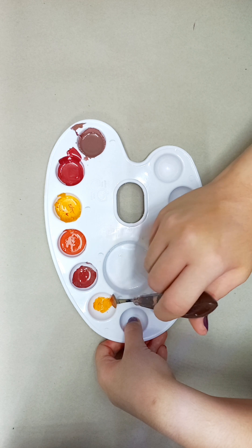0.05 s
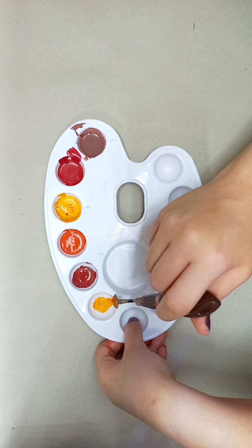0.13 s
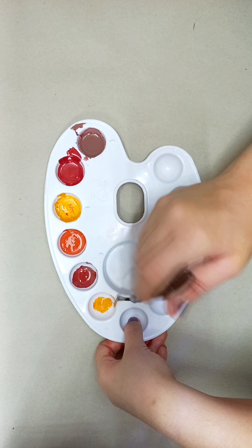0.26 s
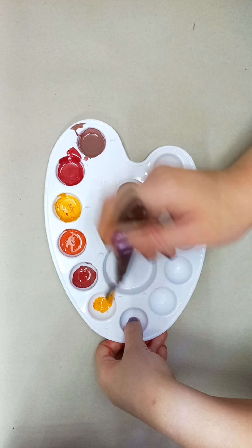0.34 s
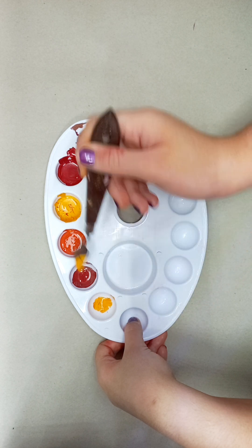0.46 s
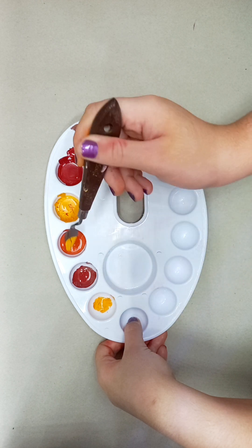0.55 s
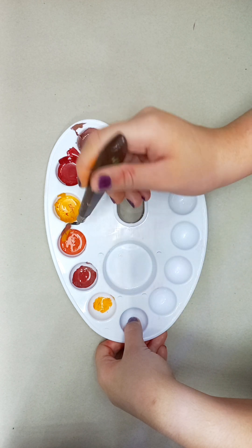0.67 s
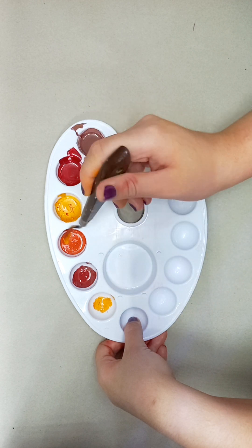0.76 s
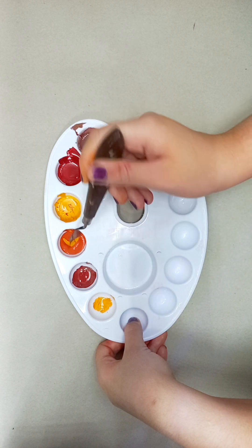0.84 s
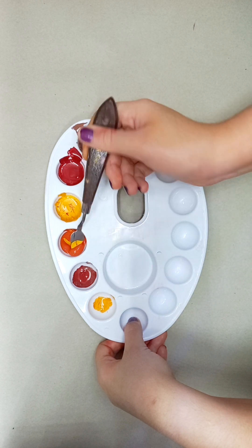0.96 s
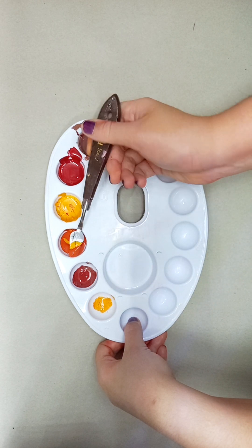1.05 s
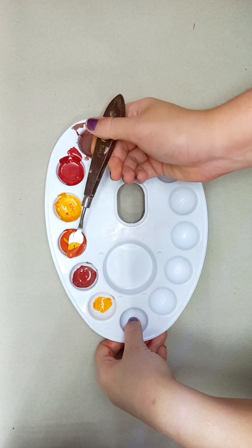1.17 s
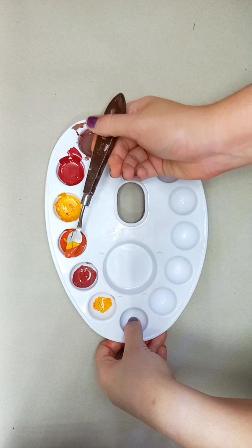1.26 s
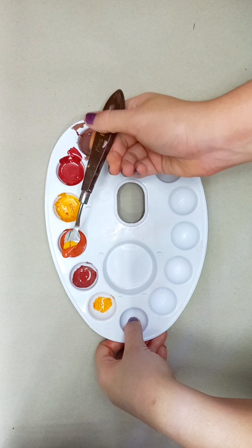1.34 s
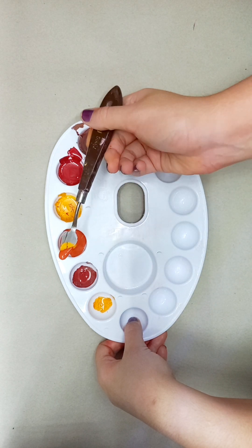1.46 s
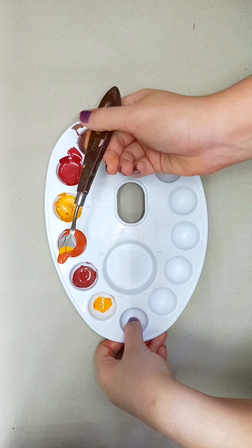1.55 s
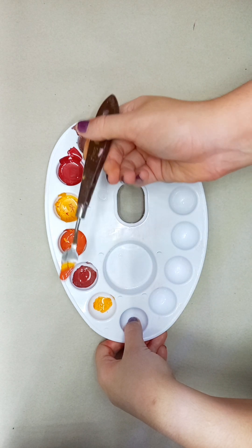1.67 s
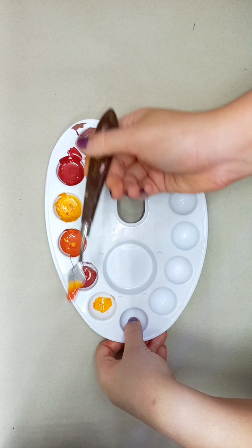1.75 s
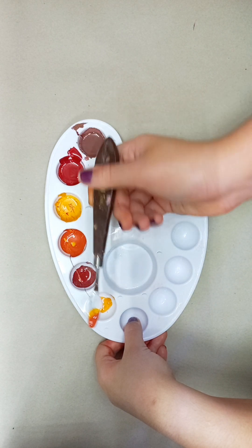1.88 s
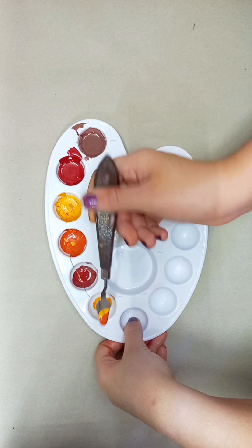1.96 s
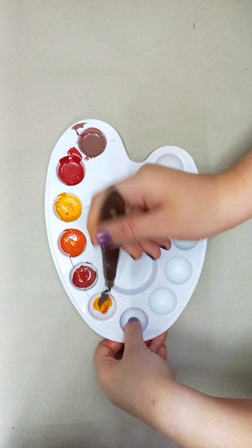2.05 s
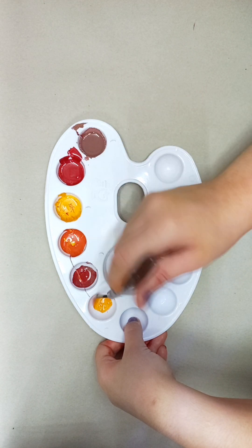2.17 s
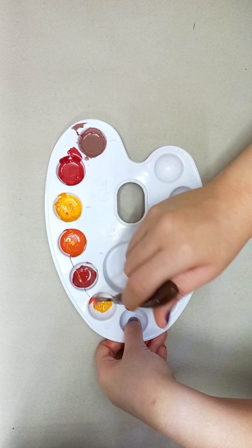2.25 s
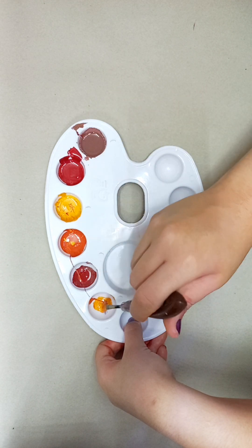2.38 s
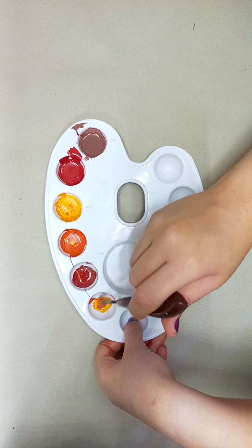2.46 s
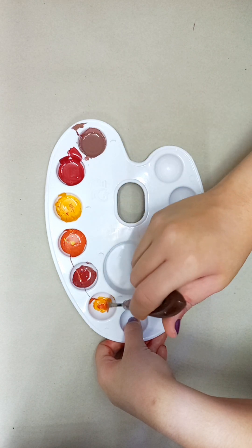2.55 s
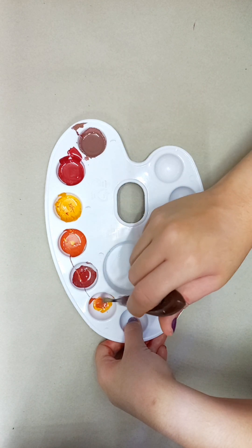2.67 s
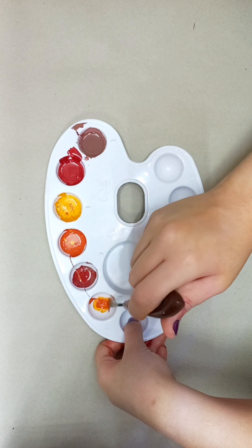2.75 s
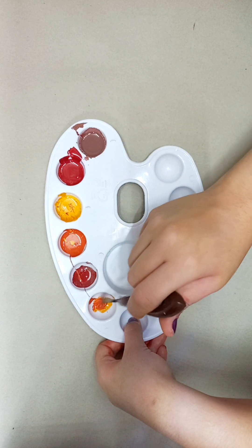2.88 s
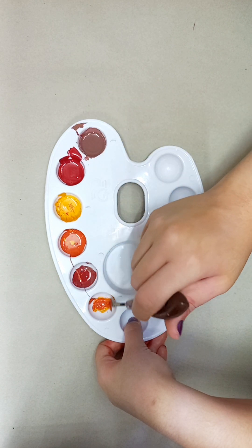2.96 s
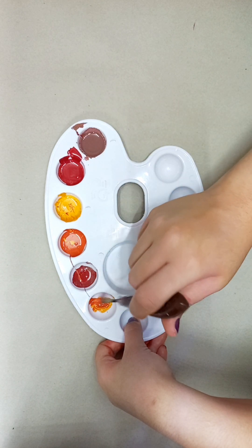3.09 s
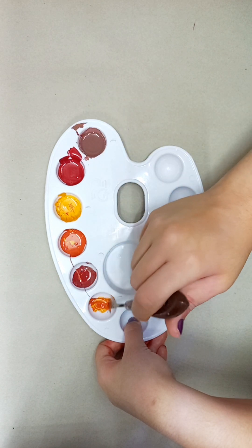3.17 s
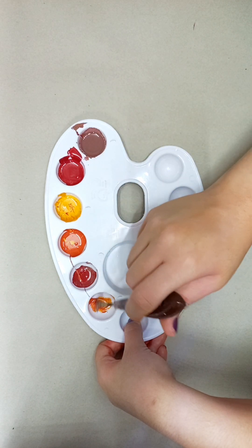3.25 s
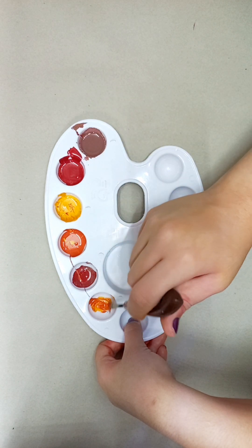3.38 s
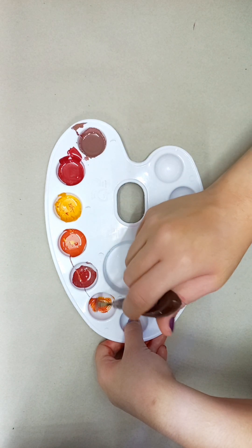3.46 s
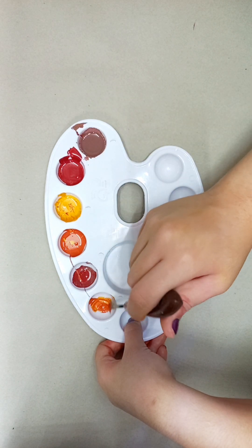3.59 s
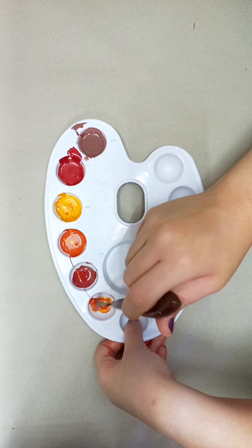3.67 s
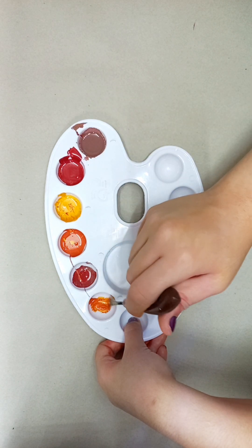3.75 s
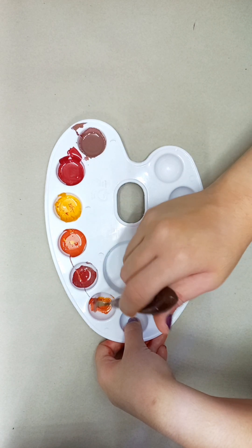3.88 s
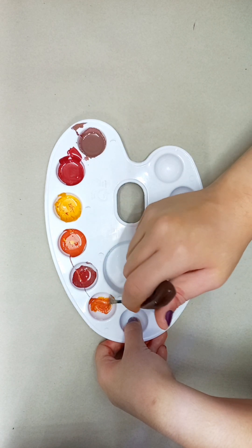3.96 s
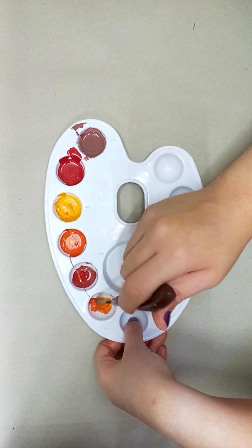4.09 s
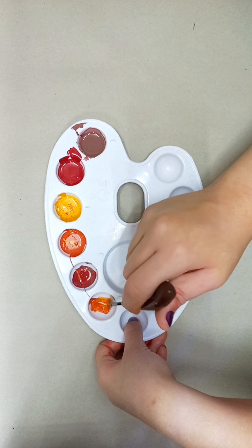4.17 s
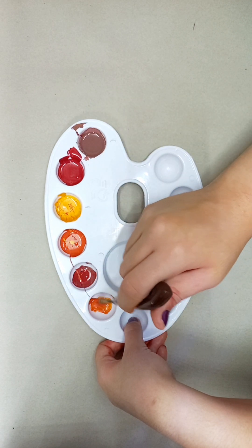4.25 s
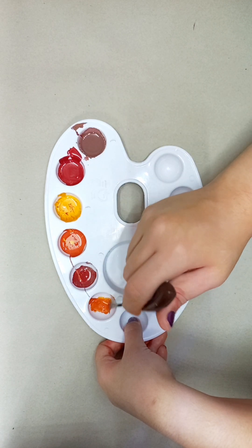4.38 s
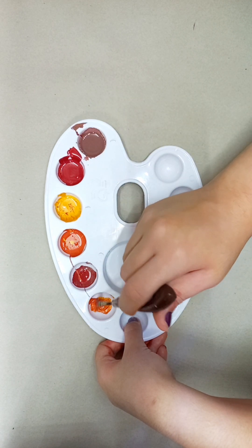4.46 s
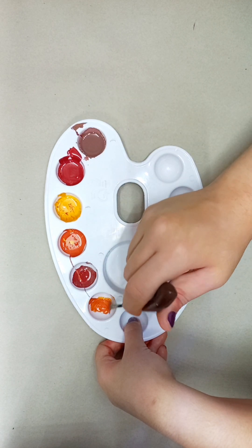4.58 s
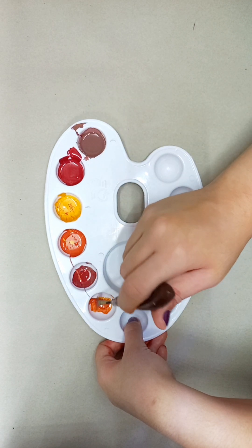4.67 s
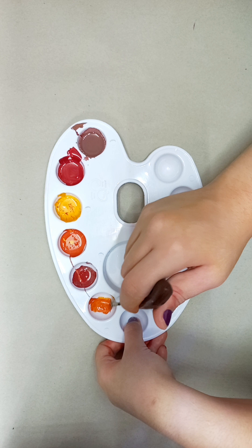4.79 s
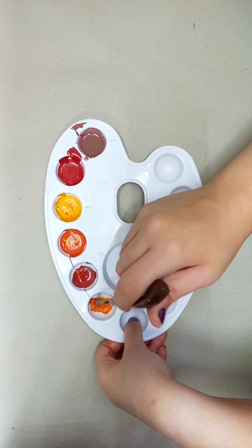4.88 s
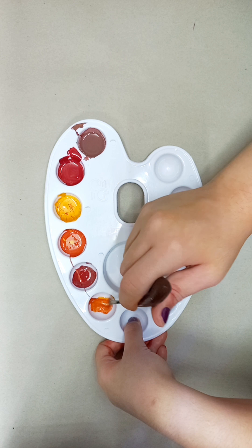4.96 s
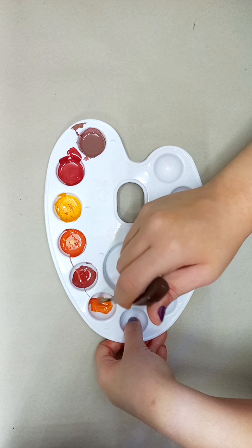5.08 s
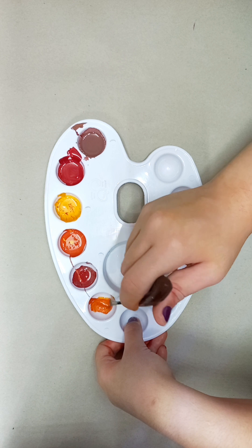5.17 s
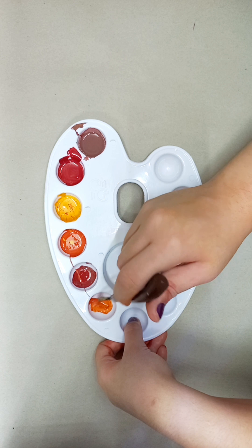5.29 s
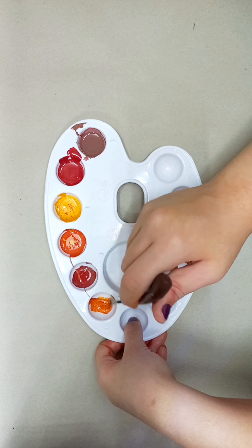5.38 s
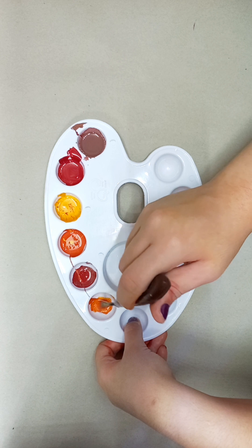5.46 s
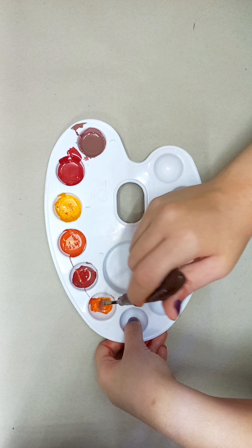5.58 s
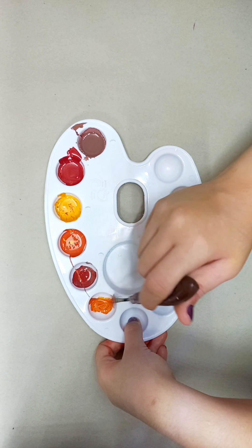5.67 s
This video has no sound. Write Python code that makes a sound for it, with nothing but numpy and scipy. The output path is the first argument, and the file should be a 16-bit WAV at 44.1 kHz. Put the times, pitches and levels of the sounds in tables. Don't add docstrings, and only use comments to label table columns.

```python
import sys
import numpy as np
from scipy import signal
from scipy.io import wavfile

SR = 44100
rng = np.random.default_rng(int(sys.argv[2]) if len(sys.argv) > 2 else 0)


def transcribe(u):
    v = np.clip(np.atleast_2d(u).T, -1, 1)
    q = np.round(v * 32767).astype(np.int16)
    wavfile.write(sys.argv[1], SR, q)


def boost(x):
    u = np.asarray(x, float) / 20
    return 10 ** u


N = 252693
RUN_IN = 4410
EDGES_HZ = 25 * 2 ** (np.arange(30) / 3.1)
BANK = [signal.butter(2, edges, "band", fs=SR, output="sos") for edges in zip(EDGES_HZ, EDGES_HZ[1:])]

# (time [s], wall ring [dB], dish pitch [Hz], dish level [dB], blade edge level [dB])
STIR_TAPS = [(2.887, -15.5, 862, -21, -35.5), (3.1243, -14.5, 907, -21, -29.5),
             (3.3168, -13.5, 917, -19.5, -32), (3.5187, -12.5, 926, -18.5, -29.5),
             (3.7271, -13, 946, -19.5, -29.5), (3.9402, -14, 962, -20, -26), (4.1428, -9.5, 920, -18, -28),
             (4.3337, -13.5, 787, -22.5, -33.5), (4.5177, -11.5, 910, -17, -33),
             (4.7222, -9.5, 920, -16, -27), (4.9432, -10.5, 922, -18.5, -24.5),
             (5.1434, -13.5, 854, -19.5, -31), (5.3314, -8.5, 916, -18, -25)]


def rms_one(x):
    return x / np.sqrt(np.mean(x ** 2) + 1e-20)


def at_hz(points, hz):
    points = np.array(points)
    return np.interp(np.log(hz), np.log(points[:, 0]), points[:, 1])


def bands(white, shape, from_hz):
    centres_hz = np.sqrt(EDGES_HZ[1:] * EDGES_HZ[:-1])
    return sum(shape(hz, signal.sosfilt(BANK[k], white[k % 2]))
               for k, hz in enumerate(centres_hz) if hz > from_hz)


def pair(mid_side, alike):
    alike = np.clip(alike, -1, 1)
    mid = np.sqrt(1 + alike) * mid_side[0]
    side = np.sqrt(1 - alike) * mid_side[1]
    return mid + side * [[1], [-1]]


def resonance(x, hz, width_hz):
    r = np.exp(-np.pi * width_hz / SR)
    numerator = np.array([1, 0, -1]) * (1 - r * r) / 2
    return signal.lfilter(numerator, [1, -2 * r * np.cos(2 * np.pi * hz / SR), r * r], x)


def add(out, sound, time_s):
    at = RUN_IN + round(time_s * SR)
    out[:, at:at + sound.shape[1]] += sound[:, :out.shape[1] - at]


def swells(rows):
    t = np.arange(N) / SR
    power = 0
    for time_s, db, length_s in rows:
        hump = np.cos(np.pi * np.clip((t - time_s) / length_s, -.5, .5)) ** 2
        power = power + (boost(db) * hump) ** 2
    return power


def air():
    # (frequency [Hz], density [dB per Hz])
    hiss_colour = [(76, -51), (130, -30), (176, -8), (202, -31), (268, -19), (296, -39), (452, -8),
                   (859, -62), (1230, -21.5), (6030, -30.5), (8140, -58), (14000, -18.5), (15800, -38.5)]
    # (frequency [Hz], left-right likeness [-1..1])
    likeness = [(60, 1), (150, 0.99), (380, -0.074), (950, -0.67), (2380, -0.1), (5980, -0.16),
                (15000, -0.11)]
    # (frequency [Hz], width [Hz], level [dB])
    duct_tones = [(169.3, 5.9, -59.5), (253.5, 18.3, -65.5), (6200, 250, -106)]
    # (frequency [Hz], width [Hz], level [dB])
    rumble_tones = [(71.8, 6.5, 1.8), (96.5, 28.5, 2), (119.5, 19, -3.5)]
    # (time [s], level [dB])
    rumble_swell = [(0.0, -48.5), (0.8, -52.5), (2.2, -51.5), (2.6, -48), (3.4, -51.5), (4.5, -47),
                    (5.73, -48)]
    hiss_db = -59
    white = rng.standard_normal((2, 2, N + RUN_IN))

    def colour(hz, v):
        return boost(at_hz(hiss_colour, hz)) * pair(v, at_hz(likeness, hz))

    def tone(hz, width_hz, db):
        noise = rng.standard_normal((2, N + RUN_IN))
        return boost(db) * rms_one(resonance(noise, hz, width_hz))

    out = boost(hiss_db) * rms_one(bands(white, colour, from_hz=130))
    for hz, width_hz, db in duct_tones:
        out += pair(tone(hz, width_hz, db), at_hz(likeness, hz))
    rumble = pair(sum(tone(*row) for row in rumble_tones), 0.91)
    rumble = signal.sosfilt(signal.butter(4, 52, "high", fs=SR, output="sos"), rumble)
    t = (np.arange(N + RUN_IN) - RUN_IN) / SR
    swell_db = np.interp(t, *np.transpose(rumble_swell))
    balance_db = [[.5], [-.5]]
    return (out + boost(swell_db) * rms_one(rumble)) * boost(balance_db)


def ring(modes, level_db, rise_s, scale=0.98, blur=2.35):
    t = np.arange(2600) / SR
    out = 0
    luck = rng.standard_normal((len(modes), 3)) * [.008, .3, 1.5]
    damping = np.array([[1], [1], [blur]])
    for k, (hz, db, t60_s, pan_db, lead, room_db) in enumerate(modes):
        detune, shift, extra_db = luck[k]
        half_lead = .5 * (lead + shift)
        phase = np.array([[half_lead], [-half_lead], [np.pi * k]])
        facing_db = np.array([[.5 * pan_db], [-.5 * pan_db], [room_db]])
        envelope = boost(db + extra_db + facing_db - 60 * damping * t / t60_s)
        out = out + envelope * np.sin(2 * np.pi * hz * scale * (1 + detune) * t + phase)
    out = out * (1 - np.exp(-t / rise_s)) ** 2
    return boost(level_db) * out / np.abs(out[:2].mean(axis=0)).max()


def crack(level_db, t60_s, colour):
    t = np.arange(1400) / SR
    white = rng.standard_normal((2, 3, 1400)) * boost(-60 * t / t60_s)
    white[:, 2] = (t == 0) * np.sqrt(np.sum(white[0, 0] ** 2)) * [[1], [-1]]

    def shape(hz, v):
        return boost(at_hz(colour, hz)) * np.vstack([pair(v, 0.19), v[2:]])

    burst = bands(white, shape, from_hz=colour[0][0])
    return boost(level_db) * burst / np.abs(burst[:2].mean(axis=0)).max()


def taps(events, wall, rim, colour, waist_db, rim_db, crack_room_db):
    # (multiple of dish pitch [ratio], level [dB], t60 [s], left-right [dB], left lead [rad], room [dB])
    dish_modes = [(.6, -3, 0.015, -2, .1, -1), (.86, -24, 0.033, 2, .1, 12),
                  (1.0, 15.5, 0.021, -0.5, 0.076, 1.5), (1.12, -7.5, 0.045, 22.5, 0.077, -2),
                  (1.3, -17.5, 0.051, 13, .3, 12.5)]
    # (frequency [Hz], level [dB], t60 [s], left-right [dB], left lead [rad], room [dB])
    waist_modes = [(1862, -20, 0.06, 32, 0.23, 1.6), (2030, 14.5, 0.013, -5, 0.31, 2.4),
                   (2094, 1.5, 0.027, 31.5, 0.71, 0.66), (2202, -2.5, 0.032, 29, 0.27, 3.4)]
    out = np.zeros((3, N + RUN_IN))
    for time_s, wall_db, dish_hz, dish_db, edge_db in events:
        start_s = time_s - .0003
        middle_db = 0.62 * wall_db + 0.34 * dish_db + waist_db
        add(out, ring(wall, wall_db + 4.0, rise_s=0.00029), start_s)
        add(out, ring(waist_modes, middle_db, rise_s=0.0014, blur=1.8), start_s)
        add(out, ring(rim, edge_db + rim_db, rise_s=0.00039), start_s)
        add(out, ring(dish_modes, dish_db + 3.5, rise_s=0.00056, scale=dish_hz, blur=1.72), start_s)
        steel = crack(edge_db + 7.0, 0.0091, colour)
        add(out, steel * boost([[0], [0], [crack_room_db]]), time_s - .0002)
    return out


def stirred_well():
    # (time [s], wall ring [dB], dish pitch [Hz], dish level [dB], blade edge level [dB])
    nudge_taps = [
        (2.2842, -51, 840, -69, -71),
        (2.5162, -30.5, 733, -30, -59),
        (2.6344, -79, 800, -40.5, -72),
        (2.6823, -31.5, 744, -27, -59),
    ]
    # (frequency [Hz], level [dB], t60 [s], left-right [dB], left lead [rad], room [dB])
    stir_wall = [(2940, 9, 0.0099, 1.6, -0.16, 7.2), (3012, 0, 0.0091, 6.5, 0.27, 9.7),
                 (3100, -5.5, 0.0072, 1.5, -0.18, 2.5), (3395, 2.5, 0.0079, 1, -1.47, 1.6)]
    # (frequency [Hz], level [dB], t60 [s], left-right [dB], left lead [rad], room [dB])
    nudge_wall = [(1870, -20, 0.012, 0.67, 0.37, 0.065), (2845, -22.5, 0.025, 5.1, .2, -1.5),
                  (3130, -14, 0.0045, 4.6, .6, .2)]
    # (frequency [Hz], level [dB], t60 [s], left-right [dB], left lead [rad], room [dB])
    stir_rim = [(3634, 10.5, 0.0096, -1, 0.014, 1.4), (3920, -8.5, 0.031, -3, 1.4, 6.9),
                (4080, 6, 0.017, 7, 2.1, 5.2), (4410, -21, 0.066, -5, 0.31, 3.9),
                (4880, -4.5, 0.033, 0, 2.1, .2)]
    well = taps(STIR_TAPS, stir_wall, stir_rim, STEEL_COLOUR,
                waist_db=-8.5, rim_db=1.5, crack_room_db=-1.1)
    well = well + taps(nudge_taps, nudge_wall, stir_rim, STEEL_COLOUR,
                       waist_db=-5.0, rim_db=15.0, crack_room_db=.2)
    well = well - 1.1 * resonance(well, 2453, 550)
    well = signal.sosfilt(signal.butter(2, 560, "high", fs=SR, output="sos"), well)
    return well - 1.03 * resonance(well, 1329, 970)


# (frequency [Hz], density [dB per Hz])
STEEL_COLOUR = [(2940, -43.5), (5000, -44), (5750, 0.5), (7060, 7.5), (7680, -1), (13300, 0),
                (15700, -11.5), (16500, -32)]


def wipes():
    # (time [s], wall ring [dB], dish pitch [Hz], dish level [dB], blade edge level [dB])
    wipe_taps = [
        (-.015, -19.5, 838, -23.5, -24.5),
        (0.0916, -19.5, 840, -19.5, -24.5),
        (0.1981, -20, 874, -19, -26.5),
    ]
    # (frequency [Hz], level [dB], t60 [s], left-right [dB], left lead [rad], room [dB])
    wipe_wall = [(1935, -12, 0.029, -7, 3.8, -0.27), (2335, -12.5, 0.038, -19, 2.5, 1.2),
                 (2465, -1.5, 0.029, 16, 0, 1.2), (2696, 9.5, 0.013, 10, 1.4, -0.96),
                 (2830, 13, 0.02, -2.5, 2.5, -0.3), (3200, -5, 0.023, 26, -1, 2)]
    # (frequency [Hz], level [dB], t60 [s], left-right [dB], left lead [rad], room [dB])
    wipe_rim = [(3520, -3, 0.028, -11, 0.94, 2.5), (3750, -12, 0.048, -1, 0.69, 0),
                (4000, -5, 0.017, -6, -1.7, 2), (4220, 18, 0.0065, -0.57, 0.05, 2),
                (4410, 3, 0.025, -2, -0.23, -10), (4960, 3, 0.0092, 3, -1.5, -11)]
    # (frequency [Hz], density [dB per Hz])
    wipe_colour = [(4200, -34), (5200, 8), (6000, -1.5), (6700, -13), (7600, 4), (9300, -1), (11000, -2.5),
                   (14000, -6.5), (16500, -25)]
    return taps(wipe_taps, wipe_wall, wipe_rim, wipe_colour,
                waist_db=-24, rim_db=11.0, crack_room_db=1.0)


def touches(out):
    # (time [s], ring level [dB], steel crack level [dB])
    touch_events = [
        (0.775, -19.5, -37.5),
        (0.828, -35.5, -56),
        (0.859, -27, -47),
        (0.931, -30, -55),
        (2.384, -13, -37),
    ]
    # (frequency [Hz], width [Hz], level [dB])
    touched_places = [
        [(491, 82, -2), (710, 110, 0.5), (1080, 110, -4), (1755, 150, -7), (1980, 80, -13), (2630, 280, -14),
         (2910, 34, -9), (3550, 370, 1.5), (4170, 240, 1), (4700, 140, -26), (4995, 380, 1)],
        [(650, 69, -6), (1116, 52, 0), (2420, 160, -1), (3430, 96, -7), (4000, 190, -11), (4940, 93, -15)],
        [(774, 120, 0), (1770, 110, -8.5), (2270, 130, -5), (2900, 120, -8.5), (3780, 320, -21),
         (4500, 270, -17)],
        [(254, 105, 1), (750, 57, -15), (1075, 160, 2.5), (1460, 78, -6.5), (1930, 110, -13), (2680, 110, -12),
         (3030, 130, -16), (3940, 240, -11)],
        [(470, 33, -10), (868, 84, 7), (1190, 140, 2.5), (1900, 230, -6.5), (2980, 310, 1.5), (4130, 730, 5)],
    ]
    for (time_s, db, crack_db), place in zip(touch_events, touched_places):
        modes = []
        for hz, width_hz, level_db in place:
            strength_db = level_db + 20 * np.log10(width_hz / 100)
            pan_db = rng.normal(0, 1.2)
            lead = hz / 4000 * rng.normal()
            modes.append((hz, strength_db, 2.6 / width_hz, pan_db, lead, .2))
        add(out, ring(modes, db + 1.5, rise_s=0.00058, blur=1.94), time_s - .0003)
        add(out, crack(crack_db + 7.0, 0.0092, STEEL_COLOUR), time_s - .0002)


def paint_ticks(out):
    # (time [s], peak level [dB])
    tick_events = [
        (3.379, -60),
        (4.6039, -74),
        (5.5132, -60),
    ]
    for time_s, db in tick_events:
        add(out, crack(db + 20.0, 0.013, [(8000, -19), (11000, 4), (15000, 8.0)]), time_s)


def knife():
    out = wipes() + stirred_well()
    touches(out)
    paint_ticks(out)
    return out


def echoes(x):
    # (left delay [s], right delay [s], level [dB])
    surfaces = [(.0037, .0042, -11), (.0071, 0.0061, -16.5), (.0094, 0.0061, -12.5), (.0165, 0.017, -25.5),
                (.0215, .022, -18)]
    out = np.zeros((2, x.shape[1]))
    for k, (left_s, right_s, db) in enumerate(surfaces):
        for side, delay_s in enumerate((left_s, right_s)):
            lag = round(delay_s * SR)
            out[side, lag:] += (-1) ** k * boost(db) * x[(side + k) % 2, :-lag]
    return out


def room(x):
    # (frequency [Hz], t60 [s])
    decay = [(300, 0.35), (1000, 0.26), (3000, 0.37), (6000, 0.29), (12000, 0.36)]
    # (frequency [Hz], level [dB])
    echo_colour = [(300, -7.5), (850, -14.5), (1400, -15), (2100, -10), (2500, -17), (2900, -24.5),
                   (3600, -14), (4500, -14), (6000, -18.5), (9000, -23), (14000, -23)]
    t = np.arange(30000) / SR
    onset = np.clip((t - .006) / 0.038, 0, 1)

    def shape(hz, v):
        return boost(at_hz(echo_colour, hz) - 60 * t / at_hz(decay, hz)) * pair(v, 0.19)

    tail = bands(rng.standard_normal((2, 2, len(t))), shape, from_hz=200)
    response = onset * tail * boost(-15.5)
    return signal.fftconvolve(x.mean(axis=0)[None], response, axes=1)[:, :x.shape[1]]


def drag():
    # (frequency [Hz], density [dB per Hz])
    rub_colour = [(290, -46.5), (500, -8), (1180, -3.5), (1220, -11.5), (1330, -6), (2160, -15.5),
                  (2320, -10.5), (9000, -30), (11700, -51), (19800, -120)]
    # (time [s], level [dB])
    contact_level = [(0, -90), (.75, -63.5), (1.1, -67), (2.1, -69), (2.5, -58), (3.1, -57.5), (5.3, -57),
                     (5.73, -62)]
    # (time of peak [s], level [dB], length [s])
    single_strokes = [
        (.93, -52, 0.33),
        (1.94, -56, 0.22),
        (2.58, -55, 0.14),
        (2.77, -52.5, 0.15),
    ]
    sweep_db, sweep_delay_s, sweep_s = -56, 0.053, 0.29
    lift_db, lift_s = -6.5, 0.031
    grains = rng.standard_normal((2, 2, N)) * boost(1.8 * rng.standard_normal(N))
    rub = bands(grains, lambda hz, v: boost(at_hz(rub_colour, hz)) * pair(v, 0.067), from_hz=400)
    lifted = np.sqrt(swells([(tap[0], 0, 2 * lift_s) for tap in STIR_TAPS]))
    contact_db = np.interp(np.arange(N) / SR, *np.transpose(contact_level))
    contact = boost(contact_db + lift_db * lifted)
    sweeps = [(tap[0] + sweep_delay_s, sweep_db, sweep_s) for tap in STIR_TAPS]
    return np.sqrt(contact ** 2 + swells(single_strokes + sweeps)) * rms_one(rub)


def smears():
    # (time [s], level [dB], frequency [Hz], length [s])
    hiss_smears = [
        (0.802, -50, 2500, .064),
        (0.884, -55, 2200, .07),
        (2.558, -57, 2800, 0.033),
        (2.759, -56, 3460, 0.052),
    ]
    # (time [s], level [dB], frequency [Hz])
    paint_peels = [(2.287, -59, 2850), (2.745, -66, 5460), (2.798, -64, 6500), (3.407, -57, 6950),
                   (3.617, -56, 6920), (4.015, -51, 7060), (4.402, -56, 6500), (4.608, -51.5, 10750),
                   (4.805, -54.5, 6030), (5.668, -60, 1950)]
    # (time [s], level [dB])
    blade_dips = [(2.842, -53.5), (3.064, -53), (3.265, -51.5), (3.473, -50), (3.685, -53), (4.472, -52),
                  (4.68, -57), (4.891, -53)]
    # (time [s], level [dB], frequency [Hz], length [s])
    squelch_smears = [
        (2.969, -52.5, 4100, .06),
        (3.389, -50, 1350, 0.035),
        (5.537, -51.5, 1410, 0.059),
        (5.574, -56, 1360, .082),
        (5.645, -61, 1190, 0.09),
    ]
    dip_hz, dip_width_hz, dip_s = 3160, 1800, 0.012
    peel_q, peel_s = 6.9, 0.014
    hiss_q, squelch_q = 1.35, 3.5
    rows = [(time_s, db, dip_hz, dip_width_hz, dip_s) for time_s, db in blade_dips]
    rows += [(time_s, db, hz, hz / peel_q, peel_s) for time_s, db, hz in paint_peels]
    rows += [(time_s, db, hz, hz / hiss_q, length_s) for time_s, db, hz, length_s in hiss_smears]
    rows += [(time_s, db, hz, hz / squelch_q, length_s) for time_s, db, hz, length_s in squelch_smears]
    out = np.zeros((2, N + RUN_IN))
    for time_s, db, hz, width_hz, length_s in rows:
        noise = pair(rng.standard_normal((2, 5000)), 0.27)[:, :round(length_s * SR)]
        for _ in range(2):
            noise = resonance(noise, hz, 1.2 * width_hz)
        smear = boost(db) * rms_one(noise) * np.hanning(noise.shape[1])
        add(out, smear, time_s - length_s / 2)
    return out


def low_pass(x, stop_hz):
    return signal.sosfilt(signal.cheby2(10, 50, stop_hz, fs=SR, output="sos"), x)


def scene():
    contacts = knife()
    far = low_pass(echoes(contacts) + room(contacts[2:]) + air(), 16300)
    near = low_pass(contacts[:2], 17100)
    return (near + far + smears())[:, RUN_IN:] + drag()


def roll_off(x):
    return signal.sosfilt(signal.butter(12, 16960, fs=SR, output="sos"), x)


def record(dry):
    return roll_off(dry)


dry = scene()
out = record(dry)
transcribe(out)
```